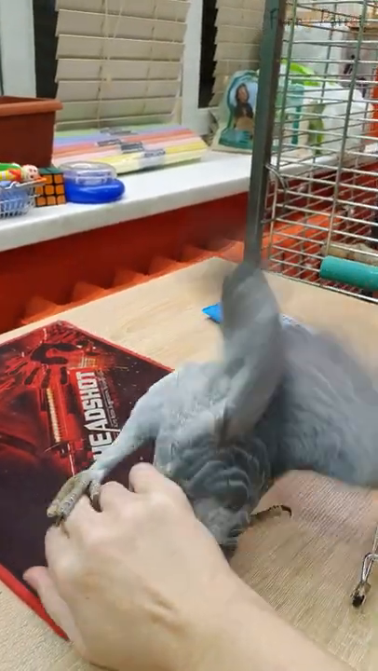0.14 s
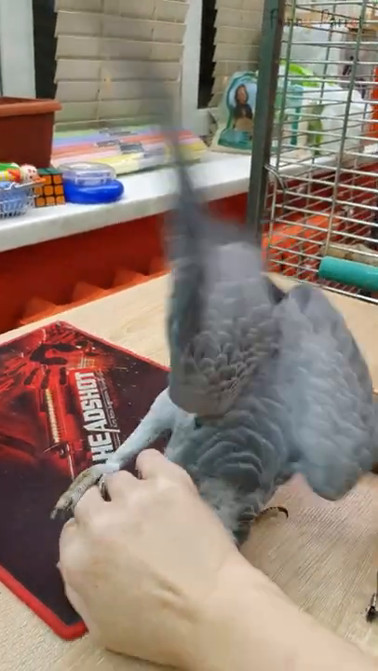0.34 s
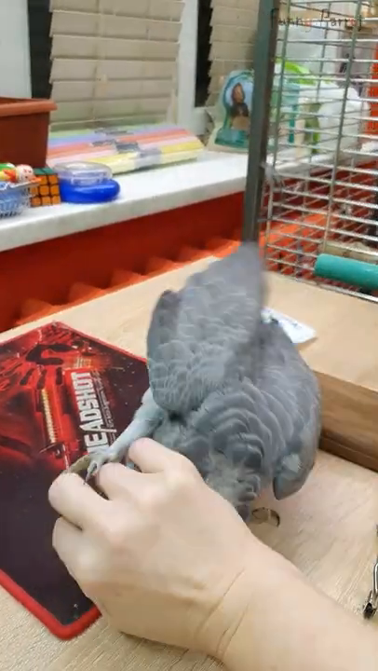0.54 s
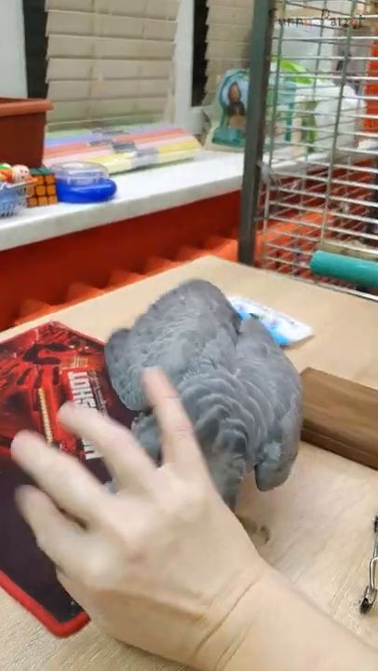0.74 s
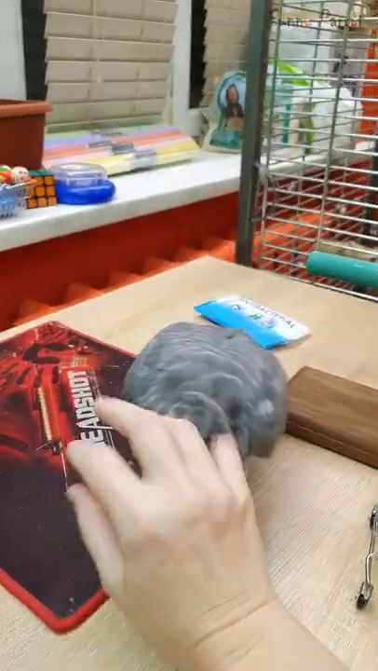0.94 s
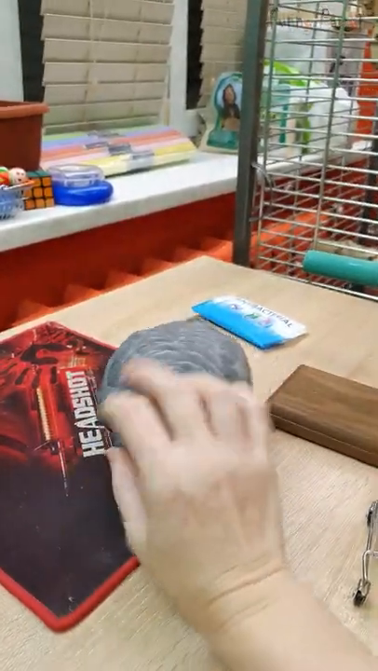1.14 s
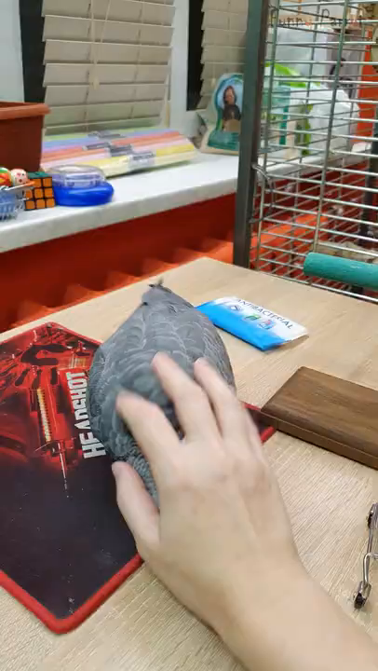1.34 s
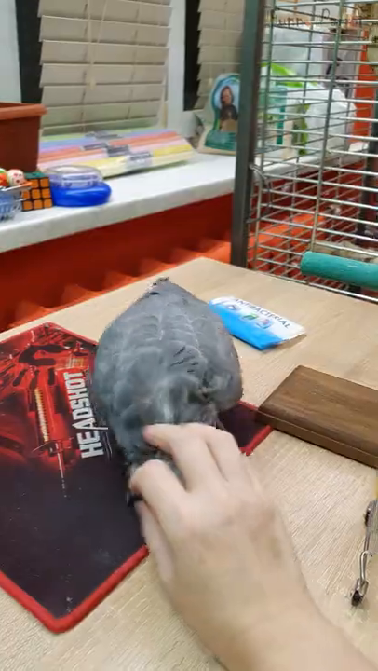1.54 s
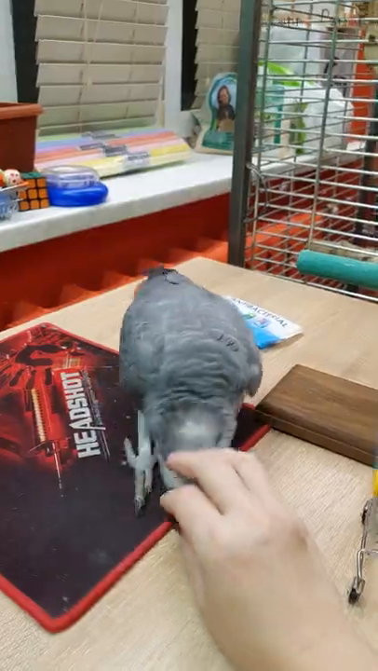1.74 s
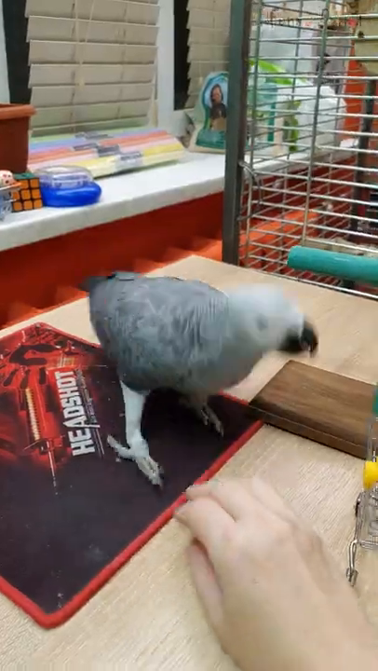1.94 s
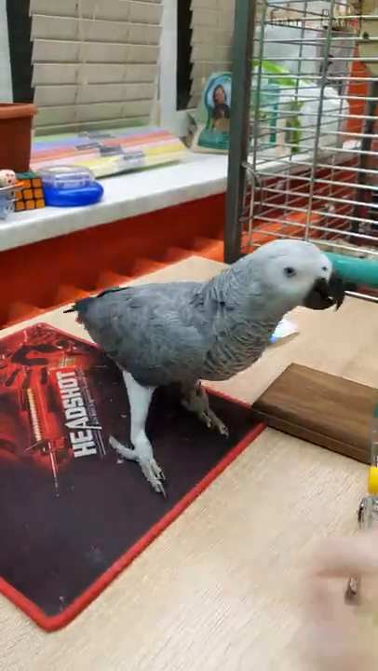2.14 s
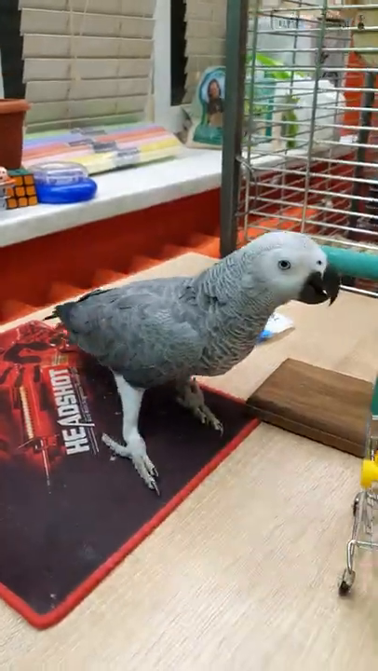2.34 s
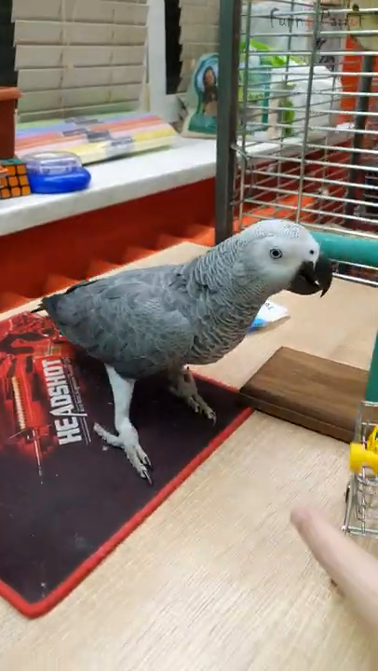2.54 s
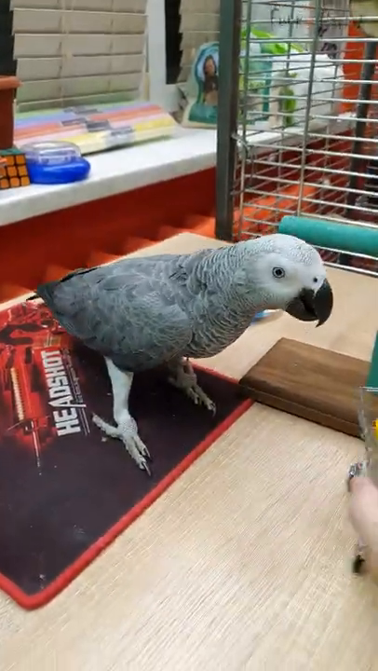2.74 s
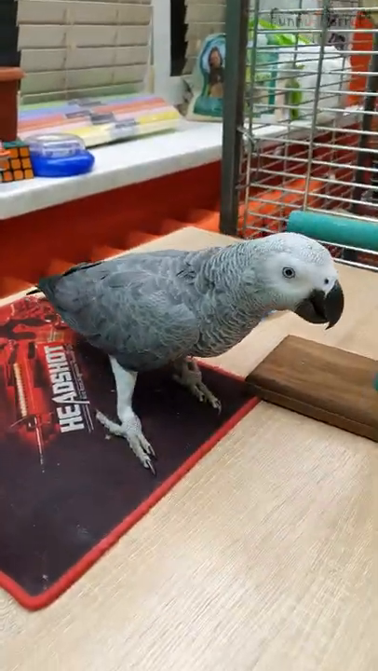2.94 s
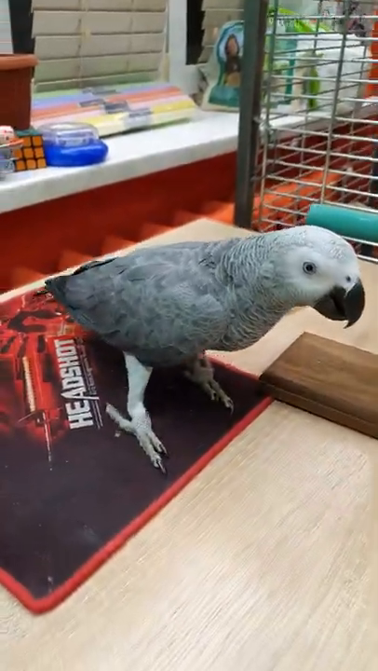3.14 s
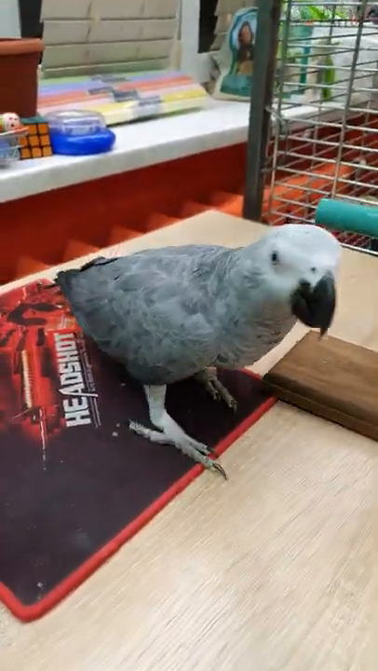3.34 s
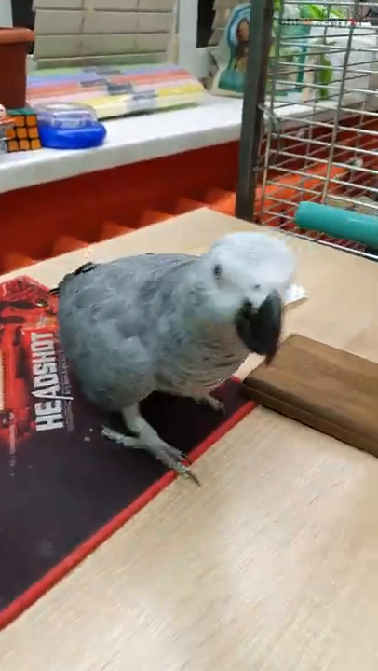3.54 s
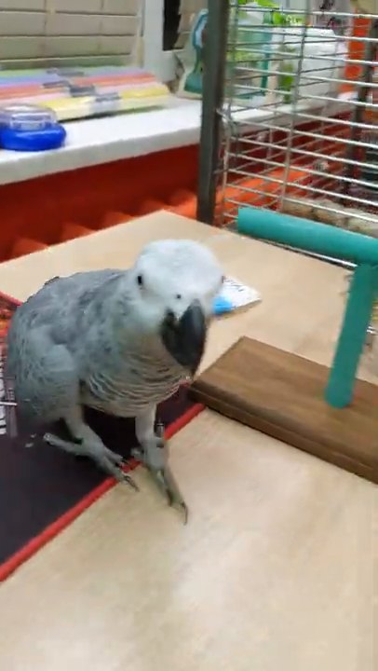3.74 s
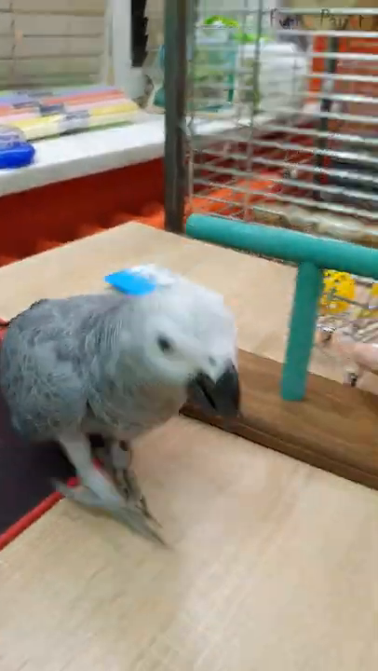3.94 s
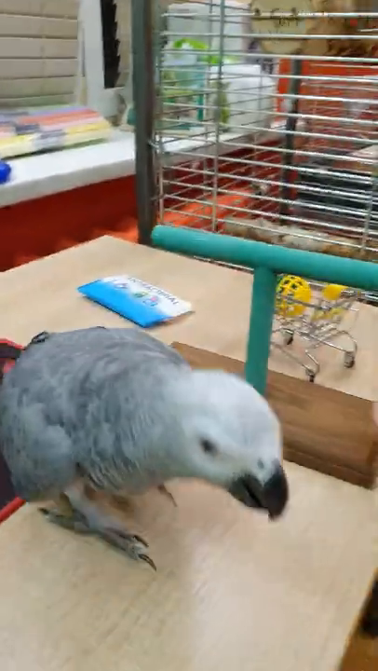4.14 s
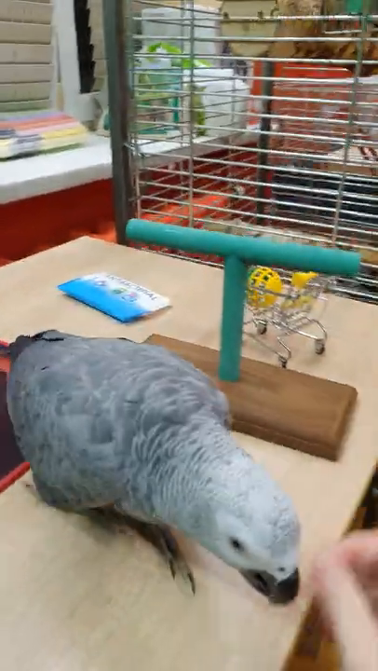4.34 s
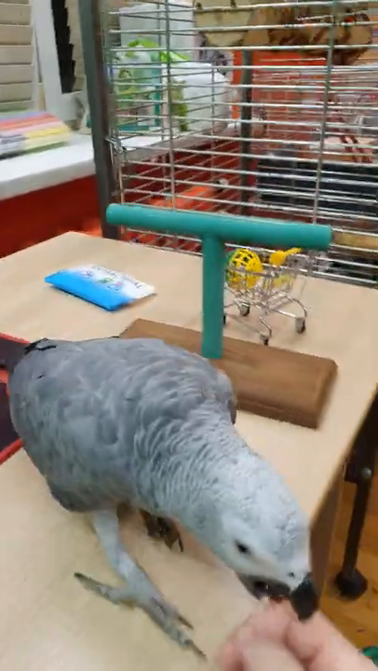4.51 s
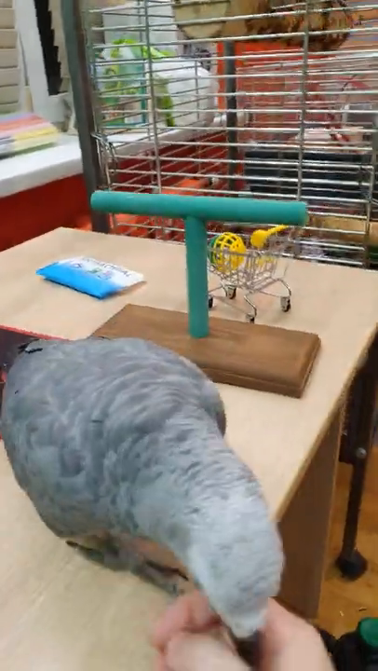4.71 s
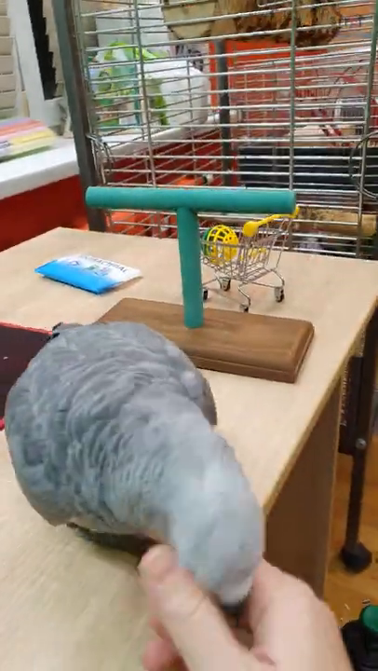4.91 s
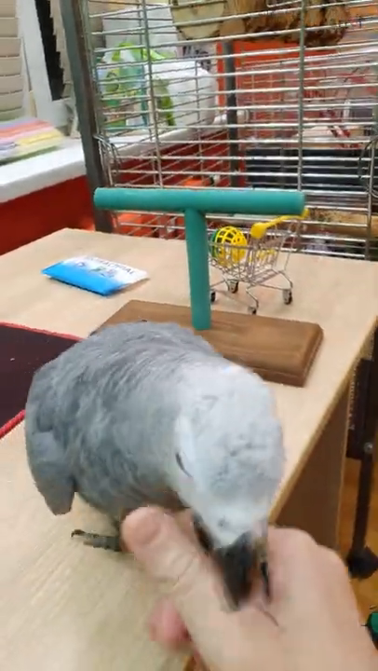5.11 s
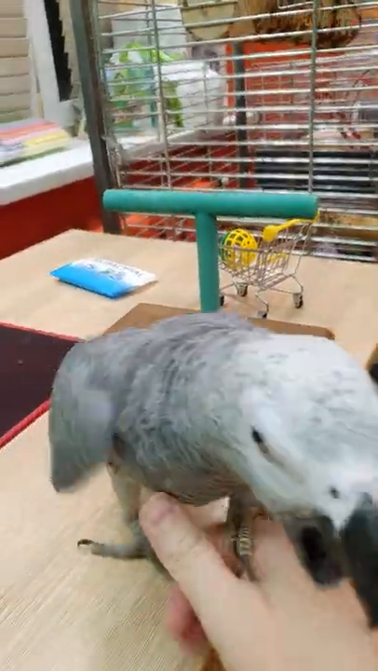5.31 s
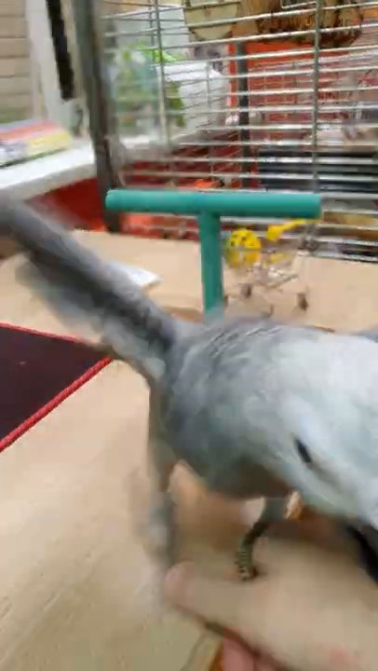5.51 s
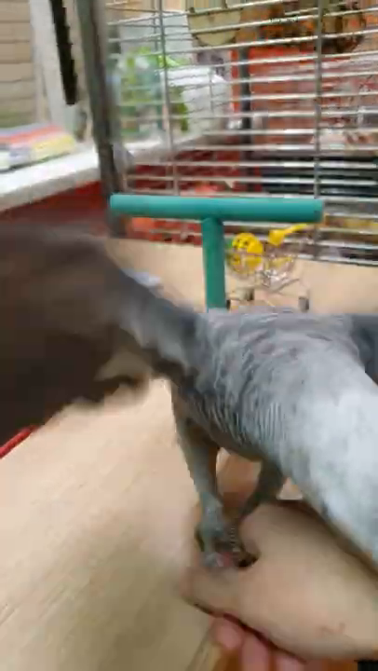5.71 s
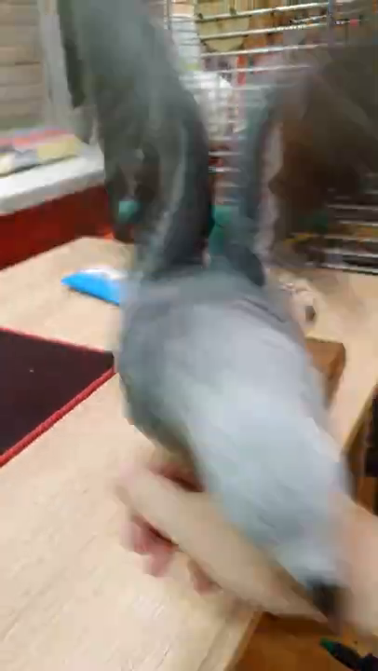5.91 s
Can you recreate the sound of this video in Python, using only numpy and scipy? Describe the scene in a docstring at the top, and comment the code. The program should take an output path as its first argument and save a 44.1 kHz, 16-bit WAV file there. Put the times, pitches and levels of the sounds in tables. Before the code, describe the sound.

A parrot scuffles on a wooden desk, its claws and beak tapping and scraping, with tiny squeaks and rustling feathers. After a lull, a small wire toy cart rattles, followed by louder knocks and scrapes. Lighter taps lead to a rasp of opening wings, and wing beats blow on the microphone. It is all heard close up in a small room with a faint low background rumble.

```python
"""A parrot scuffles on a wooden desk, close to a phone's two microphones in a small bare room.
Its claws and beak excite short wooden resonances by impact, and slipping claws squeak on the varnish.
Stick-slip friction of its feet and a wooden stand drives the modes of the desk top. A hollow object
bumps, a wire toy cart rattles and feathers rustle; at the end, wing beats blow on the microphones.
The walls add diffuse reverberation, and a low murmur of the house lies underneath."""
import sys
import numpy as np
from scipy import signal
from scipy.fft import rfft, irfft
from scipy.io import wavfile
from scipy.ndimage import uniform_filter1d, map_coordinates

SR = 44100
rng = np.random.default_rng(int(sys.argv[2]) if len(sys.argv) > 2 else 0)


def wav_record(signal):
    """Record a signal, one row per channel, as 16-bit PCM in the file named by sys.argv[1]."""
    frames = np.transpose(np.atleast_2d(signal))
    bounded = np.clip(frames, -1, 1)
    # unit amplitude maps onto the largest positive 16-bit level
    quanta = np.round(bounded * 32767).astype(np.int16)
    wavfile.write(sys.argv[1], SR, quanta)


N = 267510
SIDES = np.array([[.5], [-.5]])  # shares of pan_db, the left level minus the right


def undb(db):
    return 10 ** (np.asarray(db) / 20)


def unit(x):
    return x / np.sqrt(np.mean(x ** 2))


def add(out, start_s, x):
    i = int(start_s * SR)
    out[:, i:i + x.shape[-1]] += x[..., :N - i]


def band(x, hz, width_hz):
    """Two-pole resonance with unit gain at its centre."""
    return signal.lfilter(*signal.iirpeak(min(hz, .45 * SR), hz / width_hz, SR), x)


def body(x, modes, centre_hz=None, octave_db=0):
    """Modal superposition: neighbours have opposite signs; modes far from centre_hz are driven less."""
    out = 0
    for k, (hz, width_hz, db) in enumerate(modes):
        if centre_hz is not None:
            db = db - np.minimum(octave_db * np.log2(hz / centre_hz) ** 2, 11)
        out = out + (-1) ** k * undb(db) * band(x, hz, width_hz) / np.sqrt(width_hz)
    return out


def wander(rate_hz):
    """Slow random modulation: straight ramps between random values."""
    step = int(SR / rate_hz)
    return 1.5 * uniform_filter1d(np.repeat(rng.standard_normal(N // step + 1), step), step)[:N]


def grains(rate_hz, spread_db, hiss):
    """Shot noise: random slips of bounded size over a fine hiss."""
    size_db = spread_db * np.minimum(rng.exponential(size=N), 2.5)
    slips = (rng.random(N) < rate_hz / SR) * rng.choice([-1, 1], N) * undb(size_db)
    return unit(slips) + hiss * rng.standard_normal(N)


def pair(make, correlation):
    """Partial coherence: two microphones share an in-phase and an antiphase signal, at unit power."""
    shared, opposed = unit(make()), unit(make()) * np.array([[1], [-1]])
    return np.sqrt((1 + correlation) / 2) * shared + np.sqrt((1 - correlation) / 2) * opposed


def strokes(full_s, db, rise_s, fade_db_per_s, hold_s=0.):
    """Power envelope of each stroke per millisecond: swell, hold, exponential decay."""
    full_s, db, rise_s, fade_db_per_s, hold_s = (
        np.reshape(v, (-1, 1)) for v in (full_s, db, rise_s, fade_db_per_s, hold_s))
    age_s = np.arange(0, N / SR, .001) - full_s
    swell = np.clip(1 + age_s / rise_s, 0, 1) ** 2.03
    decay = undb(db - fade_db_per_s * np.clip(age_s - hold_s, 0, 2))
    return (swell * decay) ** 2 + 1e-20


def ms_to_samples(v):
    return np.interp(np.arange(N) * 1000 / SR, np.arange(len(v)), v)


def gain(power):
    """Incoherent addition: amplitude is the root of the summed powers."""
    return ms_to_samples(np.sqrt(power.sum(axis=0)))


def follow(power, values):
    """Power-weighted mean: the loudest stroke dominates the value."""
    return ms_to_samples(values @ power / power.sum(axis=0))


def damped_sines(events, rise_s):
    """Damped oscillators: each event swells into a sinusoid that decays exponentially."""
    out, t = np.zeros((2, N)), np.arange(9000) / SR
    onset = 1 - np.exp(-t / rise_s)
    for start_s, db, hz, t60_s in events:
        add(out, start_s, undb(db + 6.5 - 60 * t / t60_s) * np.sin(2 * np.pi * hz * t) * onset)
    return out


def house_murmur():
    """Low ambient noise, more coherent between the microphones at long wavelengths."""
    # noise spectrum: frequency_hz, density_db
    spectrum = [(15, -42.5), (25, -2), (124, -10.5), (146, -12.5), (311, -15), (349, -10), (392, -18.5),
                (649, -23), (745, -23.5), (1100, -28), (1380, -32.5), (6000, -68.5), (7800, -100),
                (13200, -120)]
    knot_hz, density_db = np.array(spectrum).T
    hz = np.fft.rfftfreq(N, 1 / SR) + 1
    shape = undb(np.interp(np.log(hz), np.log(knot_hz), density_db))
    mid, side = rfft(rng.standard_normal((2, N))) * shape
    side = side * np.clip(hz / 700, .3, 1)
    return unit(irfft(np.array([mid + side, mid - side]), N)) * undb(-58.5 + 0.51 * wander(3.3))


def room(x):
    """Diffuse reverberation: each microphone gets its own noise tail, decaying band by band."""
    # reverberant bands: centre_hz, t60_s, level_db
    decays = [(120, 0.67, -25), (383, 0.51, -6.5), (1030, 0.43, -1), (3640, 0.62, -2), (8570, 0.56, -4)]
    t, tail = np.arange(SR) / SR, 0
    for hz, t60_s, db in decays:
        noise = band(rng.standard_normal((2, SR)), hz, 0.97 * hz)
        tail = tail + noise * undb(db - 60 * t / t60_s) / np.sqrt(t60_s * SR / 14)
    build_up = 1 - np.exp(-(t / 0.0069) ** 2)
    return x + signal.fftconvolve(x, tail * build_up, axes=1)[:, :N]


def hollow_bumps():
    """A soft impact on a hollow object excites one low mode."""
    # bumps: start_s, level_db, pitch_hz, t60_s
    bumps = [(0.582, -39.5, 435, 0.076), (0.628, -34.5, 418, 0.027), (2.312, -39, 448, 0.096),
             (2.355, -33.5, 408, 0.034), (3.155, -50, 439, 0.24), (3.197, -41.5, 424, 0.05),
             (3.975, -62.5, 270, 0.064), (4.477, -46.5, 256, 0.063), (5.771, -16, 276, 0.026)]
    return damped_sines(bumps, rise_s=0.0024)


def wire_cart():
    """Lightly damped wires ring after each impulse and chatter when the cart is jolted."""
    # knocks: start_s, level_db, low_relative_db, middle_relative_db
    knocks = [(2.7422, -31, -9, -9), (2.7691, -40.5, -18, -16.5), (2.7791, -35, 2.5, -14.5),
              (2.8549, -36, -16, -14.5), (2.8924, -36, 5, -11), (2.9292, -32.5, -0.5, -8),
              (2.9667, -42.5, -12, -10), (2.9931, -25.5, -18, -34), (3.014, -24, -7, -22.5),
              (3.0849, -48, -16.5, -18), (3.0944, -37.5, -22, -22.5), (3.1644, -35.5, -21.5, -14),
              (3.2415, -47, -29, 0.5)]
    # jolts: peak_s, level_db
    jolts = [(2.694, -46.5), (2.744, -47.5), (2.799, -46.5), (2.857, -46.5), (3.008, -46.5), (3.242, -52),
             (3.298, -52), (3.343, -41), (3.562, -47), (3.63, -44)]
    # high wire modes: pitch_hz, width_hz, level_db
    high_modes = [(8154, 55, 0), (8610, 60, -5.5), (10060, 750, -6.5)]
    # middle wire modes: pitch_hz, width_hz, level_db
    middle_modes = [(3210, 90, -1.5), (3925, 50, 3), (5100, 51, 3.5), (5720, 76, -6)]
    high, middle, low = np.zeros((3, 2, N))
    for start_s, db, low_db, middle_db in knocks:
        impulse = np.array([[1], [rng.uniform(-0.2, 0.49)]])
        add(high, start_s, undb(db) * impulse)
        add(middle, start_s, undb(db + middle_db) * impulse)
        add(low, start_s, undb(db + low_db) * impulse)
    chatter = pair(lambda: body(grains(91, spread_db=-3.5, hiss=0.13), high_modes), correlation=0.043)
    shaking = gain(strokes(*np.array(jolts).T, rise_s=0.013, fade_db_per_s=162))
    rings = undb(51.5) * body(high, high_modes) + undb(59) * body(middle, middle_modes)
    low_ring = undb(46) * band(low, hz=2124, width_hz=30)
    clicks = undb(4) * band(high, hz=10500, width_hz=6000)
    return rings + low_ring + clicks + undb(4.5) * chatter * shaking


def wing_wind():
    """Air pushed by the wings loads the microphones with pressure pulses and turbulent gusts."""
    # pulses of the wing beats: start_s, level_db, pitch_hz, t60_s
    puffs = [(5.585, -18, 44.7, 0.06), (5.622, -26.5, 40.3, 0.084), (5.907, -11, 49, 0.047),
             (5.955, -19, 46, 0.093), (5.98, -39, 45, 0.15), (6.015, -43, 45, 0.089), (6.04, -15, 61, 0.15)]
    # gusts: peak_s, level_db
    gusts = [(5.484, -52), (5.57, -40), (5.64, -38.5), (5.789, -30.5), (5.88, -34), (5.98, -32),
             (6.062, -25.5)]
    turbulence = pair(lambda: band(band(rng.standard_normal(N), 43, 50), 54, 315), correlation=0.74)
    blowing = gain(strokes(*np.array(gusts).T, rise_s=0.1, fade_db_per_s=96))
    return damped_sines(puffs, rise_s=0.0048) + undb(1) * turbulence * blowing


def feather_rustle():
    """Friction noise of brushing feathers: quills give the midrange, barbs the treble."""
    # brushes: peak_s, level_db, treble_relative_db, pan_db, rise_s, fade_db_per_s
    brushes = [(0.125, -36, -12, -1.5, 0.033, 193), (0.238, -26, -3, -1, .01, 168),
               (0.346, -45.5, -11, 8, .1, 37), (0.722, -46.5, -40, 0, 0.018, 126),
               (0.866, -43, -27, -1, .005, 88), (0.93, -48, -5, 3, .05, 115),
               (1.125, -52, -25, 7, 0.013, 80), (1.285, -52, -9, 3, 0.054, 52.5),
               (1.841, -48.5, -13.5, 0.5, 0.016, 172), (2.624, -47, -16, -1, 0.044, 72),
               (2.691, -32.5, -7, 0, 0.035, 114), (2.86, -45.5, -4.5, -2, 0.11, 49),
               (3.032, -55, 5, -11, 0.28, 323), (3.287, -34, -0.5, 19, 0.011, 103),
               (3.335, -24, -10, 2, 0.018, 125), (3.44, -36, -3.5, 0, 0.025, 71),
               (3.49, -49, -18, -7, .04, 262), (3.559, -26.5, -8.5, 1, 0.0045, 135),
               (3.64, -37.5, -4, 4, .05, 75), (3.868, -42, -27, 1.5, .01, 145),
               (4.017, -43.5, -3, 2.5, .006, 128), (4.262, -49, -3.5, 0, 0.0065, 96),
               (4.335, -45, -13, 2, .01, 112), (4.538, -47.5, -5, 1.5, 0.06, 75),
               (4.8, -50, -7, 2, 0.026, 83), (5.33, -55, 7.5, 5, 0.019, 60),
               (5.375, -37.5, -4, -1, 0.046, 7), (5.8, -46, -15, 8, .06, 150),
               (5.905, -28, -8, 0.5, .004, 152), (5.93, -35, -1, 6, .02, 25), (6.02, -35, -5, 2, .04, 20)]
    # quill resonances: centre_hz, width_hz, level_db
    quill_modes = [(1810, 1200, 3), (2290, 820, 6.5), (3500, 1600, 3.5), (5230, 2600, -1)]
    # barb resonances: centre_hz, width_hz, level_db
    barb_modes = [(6470, 1230, 0), (9200, 870, -4), (10910, 2000, -1.5), (14600, 1900, -8)]
    quills = pair(lambda: band(body(grains(900, spread_db=4, hiss=1), quill_modes), 2100, 4100), 0.014)
    barbs = pair(lambda: band(body(grains(600, spread_db=1, hiss=.85), barb_modes), 6900, 17000), 0.034)
    peak_s, db, treble_db, pan_db, rise_s, fade = np.array(brushes, float).T
    middle = strokes(peak_s, db, rise_s, fade)
    treble = strokes(peak_s, db + treble_db, rise_s, fade)
    flutter = undb(2.6 * wander(30) - 6.5)
    return (quills * gain(middle) + barbs * gain(treble)) * flutter * undb(follow(middle, pan_db) * SIDES)


def wing_spread():
    """Sliding friction: flight feathers rasp over each other as the wings open."""
    # vane resonances: centre_hz, width_hz, level_db
    vane_modes = [(2420, 240, 0), (2670, 210, -5), (3690, 200, -1), (5400, 220, -6), (6860, 230, -5),
                  (8770, 200, -8), (10300, 150, -9), (11000, 180, -7)]
    rasp = pair(lambda: body(grains(900, spread_db=0, hiss=0.86), vane_modes), correlation=0.046)
    position = np.cumsum(1 + .012 * wander(6))  # an uneven read speed makes the pitch waver
    rasp = np.array([map_coordinates(channel, [position], mode="mirror") for channel in rasp])
    opening = gain(strokes(full_s=5.385, db=-40, rise_s=0.069, fade_db_per_s=63))
    pan_db = 4.5
    return rasp * opening * undb(4.5 + 0.64 * wander(25) + pan_db * SIDES)


def desk_drags():
    """Stick-slip friction drives desk top and stand; the contact point selects the modes that sound."""
    # strokes of feet and stand:
    # full_s, rumble_db, scrape_db, rumble_hz, scrape_hz, rise_s, hold_s, rumble_fade_db_per_s
    drags = [(0.173, -33, -31.5, 158, 1795, .012, .02, 59), (0.235, -27, -29.5, 180, 830, .05, 0.027, 73.5),
             (0.401, -39.5, -48.5, 165, 1830, .08, 0.095, 260.5),
             (0.606, -54.5, -53, 166, 780, .06, .01, 196), (0.72, -45.5, -40.5, 168, 886, .04, .02, 152),
             (0.878, -56.5, -50.5, 126.2, 1447, .02, 0.055, 132.5),
             (2.647, -43.5, -47, 167, 1000, .03, .04, 57.5), (2.7, -30, -33, 131, 780, .025, 0.016, 109.5),
             (2.787, -42.5, -52.5, 130, 1250, .04, .07, 106.5),
             (2.95, -54, -69, 115, 1520, .05, .05, 151.5), (3.294, -25.5, -30, 160, 1300, .012, .1, 72),
             (3.433, -40.5, -22.5, 165, 1235, .015, 0.1, 81.5),
             (3.6, -27, -31.5, 222, 1080, .07, .07, 100.5),
             (3.742, -36.5, -36.5, 200, 1050, .05, 0.026, 70),
             (3.886, -41, -62.5, 235, 1030, .05, 0.026, 172), (3.99, -59, -67, 231, 1880, .04, 0.027, 162)]
    # low wood modes: pitch_hz, width_hz, level_db
    low_modes = [(71.6, 24, -1), (127.2, 8.3, -2), (159.7, 17.2, -5), (227.1, 17, -2), (273.4, 21, -3.5),
                 (438, 140, -1.5)]
    # high wood modes: pitch_hz, width_hz, level_db
    high_modes = [(475.4, 95, -2), (682, 220, 3), (850, 37, -4), (1067, 70, -2), (1150, 120, -11.5),
                  (1198, 40, -3.5), (1507, 99, -9.5), (1651, 35, 0.5), (1970, 590, 6)]
    full_s, rumble_db, scrape_db, rumble_hz, scrape_hz, rise_s, hold_s, fade = np.array(drags, float).T
    low = strokes(full_s, rumble_db, rise_s, fade, hold_s)
    high = strokes(full_s, scrape_db, rise_s, 2.55 * fade, hold_s)
    rumble = pair(lambda: body(grains(150, spread_db=1, hiss=0.88), low_modes,
                               follow(low, rumble_hz), octave_db=15), correlation=1)
    scrape = pair(lambda: body(grains(760, spread_db=6, hiss=0.73), high_modes,
                               follow(high, scrape_hz), octave_db=24.5), correlation=0.051)
    return rumble * gain(low) + scrape * gain(high) * undb(-2.5 + 2.6 * wander(40))


def claw_squeaks():
    """Friction-excited vibration: a claw slipping on varnish gives a brief tone."""
    # slips: start_s, level_db, pitch_hz, t60_s
    squeaks = [(0.168, -31, 1874, .06), (0.453, -39, 1840, 0.063), (0.886, -41, 1290, .05),
               (0.901, -37, 1510, 0.046), (0.917, -34.5, 1365, 0.047), (0.945, -41, 1344, .05),
               (1.11, -34, 2334, 0.031), (1.84, -58, 1994, .08)]
    return damped_sines(squeaks, rise_s=0.0022)


def claw_and_beak_taps():
    """Impact excitation of wood: a damped tone in a band of noise, with a shorter bright crack."""
    # impacts: start_s, level_db, pitch_hz, treble_relative_db, pan_db
    taps = [(0.012, -39.5, 2330, 0, -3.5), (0.059, -31, 2490, -3.5, -2), (0.093, -33.5, 2400, -17.5, -6),
            (0.1, -28.5, 2600, -7, -2), (0.122, -17, 2410, -28, -4), (0.169, -22, 1930, -14.5, -5),
            (0.232, -8.5, 710, -18, 1), (0.441, -42.5, 830, 2, -2), (0.565, -39, 1760, -13, -4),
            (0.581, -33.5, 2120, -17, -3), (0.608, -32, 2120, -20, -3), (0.695, -29.5, 710, -46, -9.5),
            (0.714, -23, 700, -50, -1.5), (0.715, -24.5, 1530, -51, 4), (0.863, -22, 1550, -52, -4),
            (0.865, -28, 2800, -38, 2), (0.889, -41, 2800, -11, 4), (0.91, -42, 2800, -5.5, 1),
            (0.943, -42, 2700, -7, 12.5), (0.958, -33, 1610, -11, -4), (1.023, -36.5, 2450, -10.5, 2),
            (1.109, -21, 2220, -52, -3.5), (1.144, -30.5, 2040, -50, 13.5), (1.198, -38, 2380, -19, -5),
            (1.269, -42, 2330, -6, -2.5), (1.824, -50, 2130, -29, 6), (1.848, -34.5, 754, -33.5, 0),
            (2.624, -37.5, 1070, -7, 2), (2.696, -21.5, 740, -3.5, 1), (3.287, -11.5, 1344, -20, -4),
            (3.333, -16.5, 1280, -15, -8), (3.467, -21, 1120, -38.5, -14), (3.556, -12, 1085, -6.5, 2.5),
            (3.865, -28.5, 680, -12.5, 2), (4.012, -40, 2100, -0.5, -5), (4.034, -50.5, 2310, 4.5, 9.5),
            (4.257, -51.5, 2710, 3, -4), (4.267, -44, 2740, -3, 1), (4.289, -49, 2380, -2, 0),
            (4.328, -28, 1617, -38, 0.5), (4.474, -41.5, 2600, -20, 3), (4.53, -45, 2320, -6, -2.5),
            (4.78, -44, 3990, -17, 3.5), (5.033, -56, 2960, -6.5, 3), (5.903, -18, 2010, -6.5, 1.5)]
    out, t = np.zeros((2, N)), np.arange(3000) / SR
    ring_t60_s = 0.035
    ring_envelope = undb(-60 * t / ring_t60_s) * (1 - np.exp(-t / 0.00042))
    for start_s, db, hz, treble_db, pan_db in taps:
        noise, phase = rng.standard_normal((4, len(t))), rng.random((2, 1))
        skirt = unit(band(band(noise[:2], 1.047 * hz, 0.5 * hz), 0.77 * hz, .9 * hz))
        ring = (0.54 * np.sin(2 * np.pi * (hz * t + phase)) + 0.67 * skirt) * ring_envelope
        crack = unit(band(band(noise[2:], 4800, 6700), 6500, 6600)) * undb(-110 * t / ring_t60_s)
        tap = undb(-3.5) * ring + undb(treble_db + 6.5) * crack
        add(out, start_s, undb(db + pan_db * SIDES) * tap)
    return out


def scene():
    """Superposition: contact sounds reverberate; wind on the microphones and the murmur add directly."""
    contacts = claw_and_beak_taps() + claw_squeaks() + hollow_bumps() + desk_drags()
    feathers = feather_rustle() + wing_spread()
    return room(contacts + feathers + wire_cart()) + wing_wind() + house_murmur()


def record(dry):
    """Band limiting: the phone cuts the deepest bass and the highest treble."""
    bass_cut_hz, top_hz = 42, 16200
    high_pass = signal.butter(3, bass_cut_hz, "high", fs=SR, output="sos")
    low_pass = signal.ellip(10, .2, 80, top_hz, fs=SR, output="sos")
    return signal.sosfilt(low_pass, signal.sosfilt(high_pass, dry))


dry = scene()
out = record(dry)
wav_record(out)
```